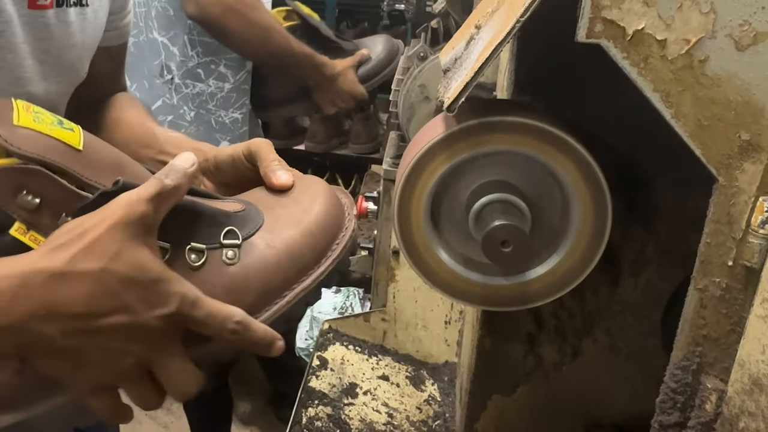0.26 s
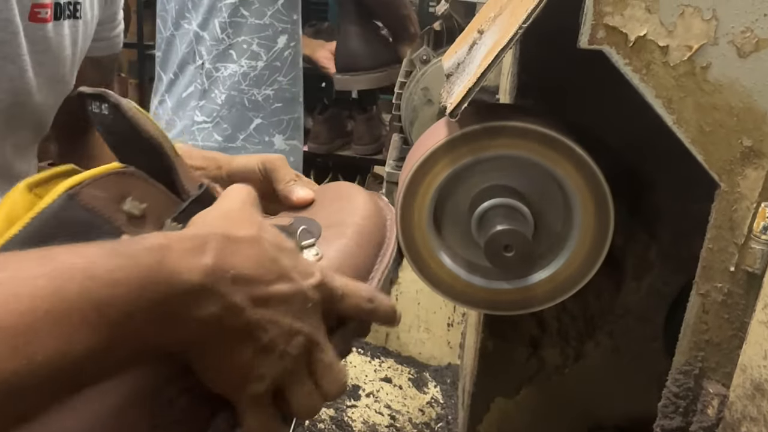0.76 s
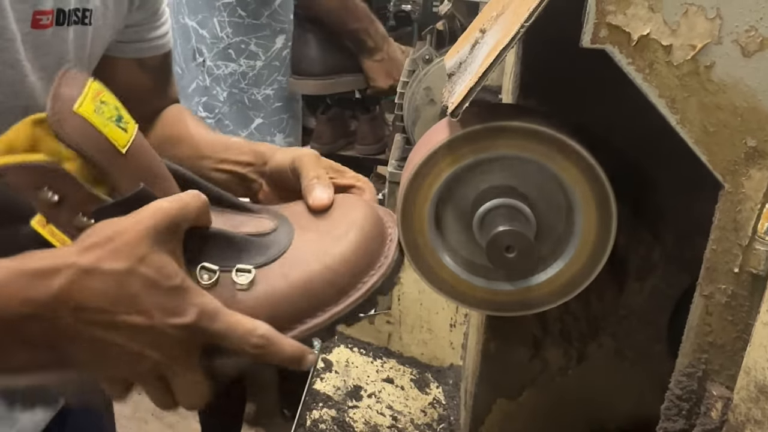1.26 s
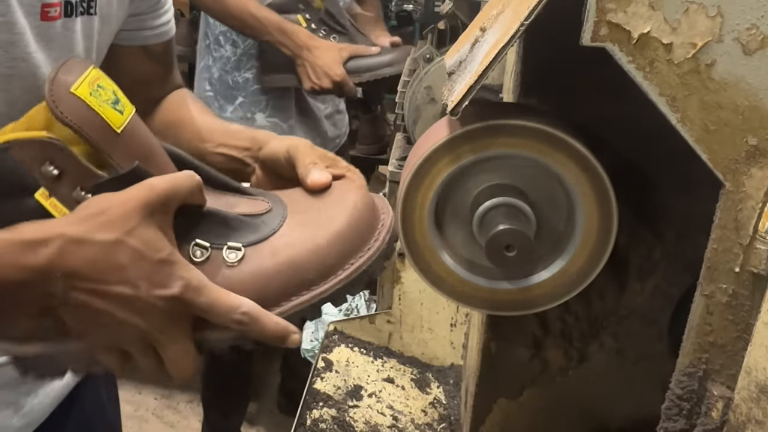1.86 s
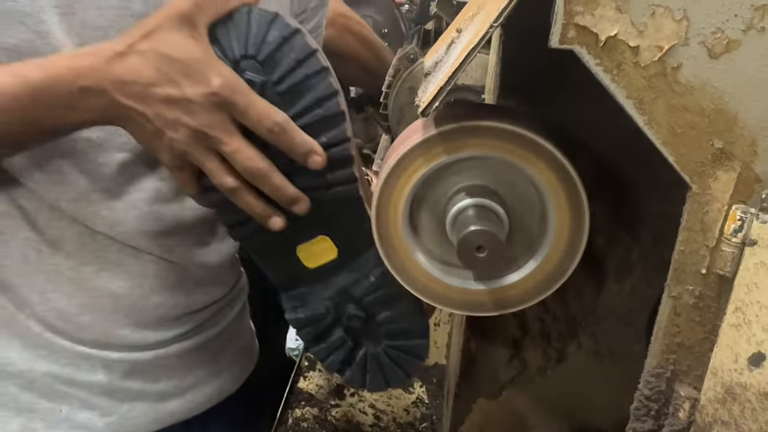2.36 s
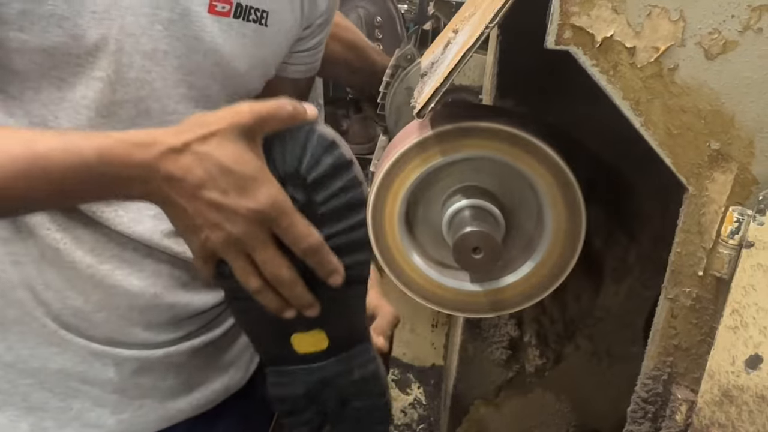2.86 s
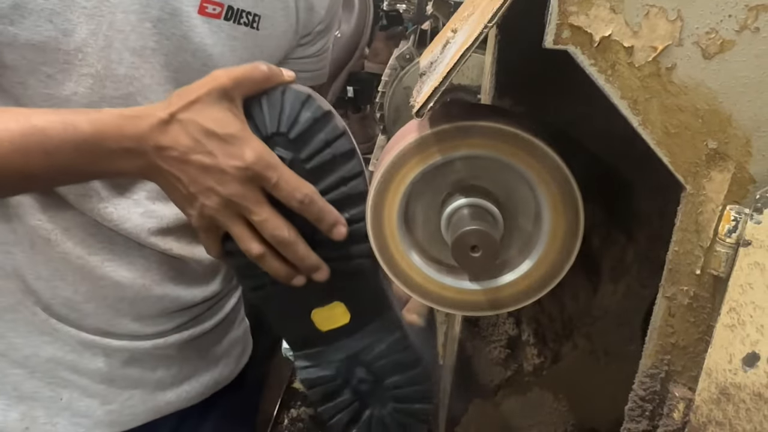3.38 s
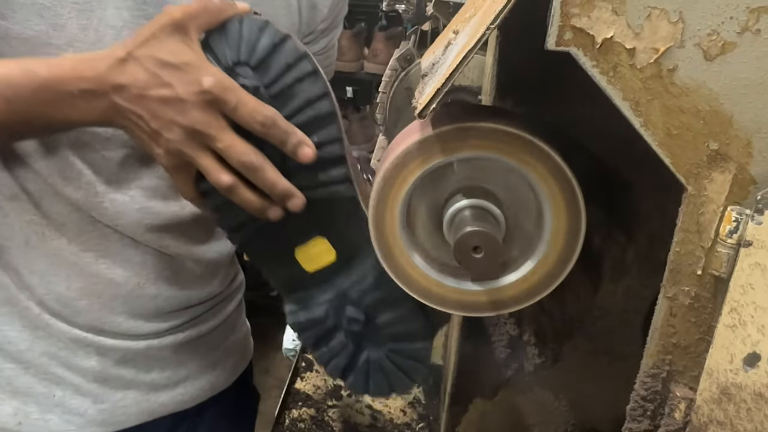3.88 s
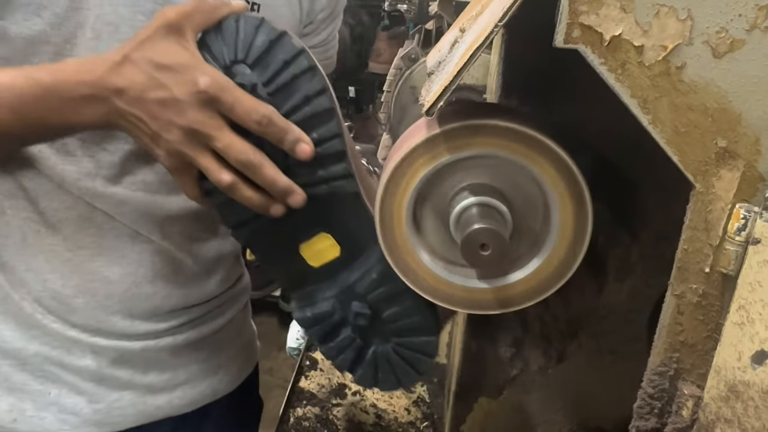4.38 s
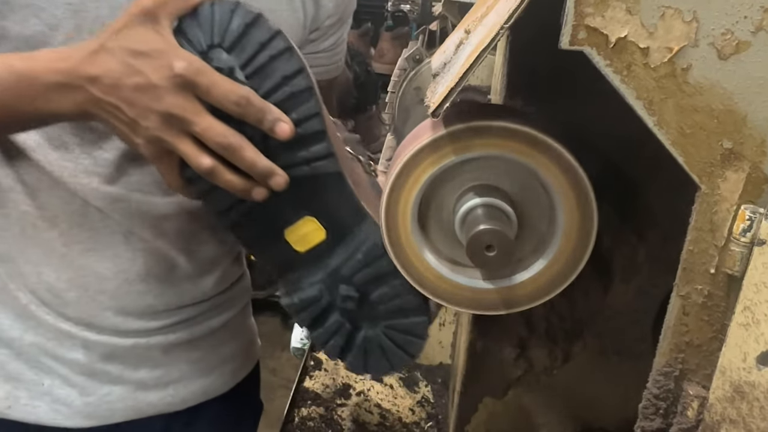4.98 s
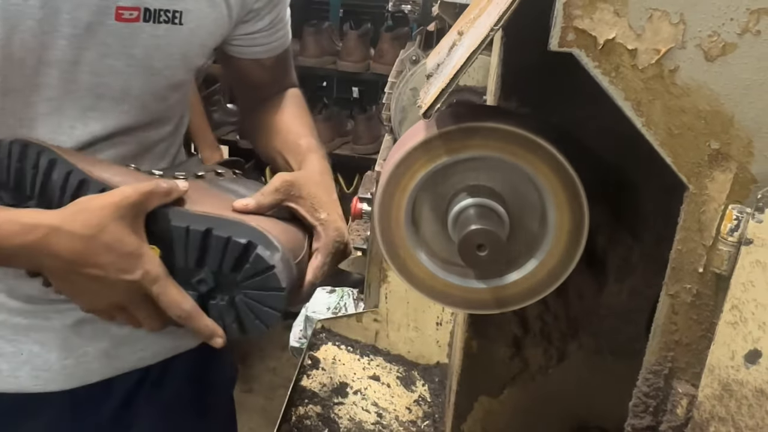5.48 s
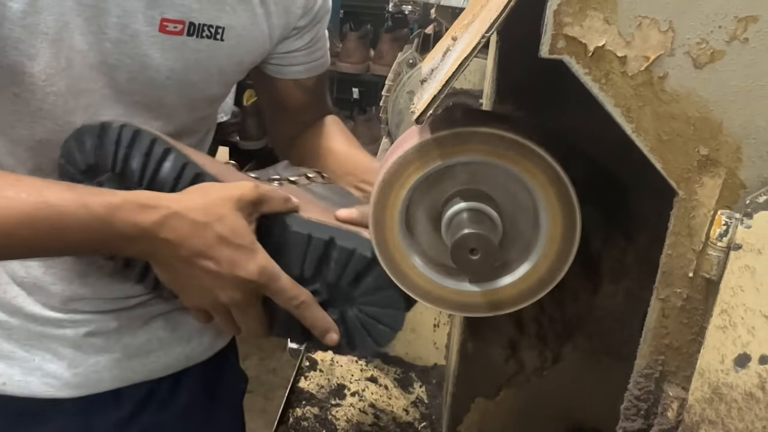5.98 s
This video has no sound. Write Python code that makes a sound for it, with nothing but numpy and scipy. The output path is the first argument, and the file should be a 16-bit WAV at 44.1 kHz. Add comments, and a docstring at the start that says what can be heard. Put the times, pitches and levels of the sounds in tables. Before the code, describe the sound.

Close stereo sound in a shoe factory. Throughout, an extractor fan booms through sheet-metal ducting, a deep roar strongest in the low range, with a near-steady low hum that gently swells; far machines hiss faintly. At first only this is heard, with a tiny dull knock about 0.55 s. From 0.8 s a boot's leather meets a spinning wheel: bright, dry rasping strokes near 0.8, 1.2, 1.6 and 2.05 s, each about 0.2 s, fluttering rapidly around fifty times a second. A thin high squeal colours 1.05-1.4 s, with a soft thud at 1.2. A short knock at 2.25 marks the turn to rubber. Dense, hissing, gritty passes run to 3.9 s with quick ticks and a hollow drone, then lighter steady rubbing until a stronger press near 5.1. Contact almost vanishes at 5.25-5.8, except a weak brush at 5.5 and a dull bump at 5.7, then firm scraping returns to the end, about 6.2 s.

```python
"""Shoe factory: an extractor fan roars in its sheet-metal duct and hums at its blade rate; far machines hiss.
A boot is pressed on a spinning buffing wheel: four strokes on leather, then long passes along rubber.
The wheel is out of round, so the scraping throbs once a turn. Light contact squeals; the boot body drones.
Air, scraping, squeal and drone are shaped noise, the blade hum is sines, thuds are filtered noise bursts.
Two close microphone ports hear it."""
import sys
import numpy as np
from scipy import signal
from scipy.io import wavfile
from scipy.ndimage import uniform_filter1d

SR = 44100
rng = np.random.default_rng(int(sys.argv[2]) if len(sys.argv) > 2 else 0)


def persist_wave(psi):
    """Save psi, clipped to +-1, as 16-bit WAV."""
    counts = np.round(np.clip(psi, -1, 1) * 32767).astype(np.int16)
    wavfile.write(sys.argv[1], SR, np.atleast_2d(counts).T)


N = 275075

# All spectra are relative: noise() scales its result to rms 1.
# Port pair. Each row: frequency in Hz, left-right likeness 0-1, left lead in radians, left over right in dB.
PORTS = [(20, .99, 0, 0), (100, .993, -.08, -.7), (200, .985, -.2, -1.6), (330, .8, -.6, -.6),
         (700, .6, -.9, -3), (1150, .55, -.5, -1), (1600, .3, -1, -1), (2050, .75, 0, .3),
         (3000, .62, 1.1, .5), (4400, .75, .3, 1.2), (5500, .45, 1.2, 1), (6700, .58, .8, 2),
         (7600, .6, 2.6, 4), (8200, .85, 5.8, 2.5), (8700, .9, 6.1, .3), (9700, .62, 4.7, 0),
         (10550, .985, np.pi, 0), (10900, .999, np.pi, 0), (11900, .995, np.pi, 0), (12600, .72, 2, 0),
         (13300, .8, .8, 0), (14000, .99, 0, 0), (14900, .98, 0, 0), (15800, .72, -.8, .5)]
EDGE_HZ = 15780  # top of the recorder's band

# Duct turbulence. Each row: frequency in Hz, density in dB per Hz.
AIR_SPECTRUM = [(20, -48), (32, -49), (50, -20.5), (85, -15), (140, -16.5), (250, -17.5), (500, -24.5),
                (800, -31.5)]
# Duct resonances. Each row: frequency in Hz, width in Hz, density in dB per Hz.
DUCT_RESONANCES = [(96, 19, -13.5), (142.4, 32, 0.5), (189.6, 21, -4.5), (218, 14, -16.5), (267, 18, -28),
                   (301, 25, -20.5), (342, 20, -14), (367.5, 43.4, -12), (457, 35, -18), (505, 30, -28.5),
                   (558.7, 16, -19.5), (602, 34, -24), (658, 59, -23), (928, 140, -35)]
# Roar level. Each row: time in seconds, level in dB.
ROAR_LEVEL = [(0, -17.5), (.6, -18.5), (2.2, -18), (2.5, -17), (2.9, -17.5), (3.1, -17), (3.7, -17),
              (4, -16.5), (4.3, -17.5), (4.6, -17), (5.25, -17), (5.6, -18.5), (6.24, -17)]

BLADE_HZ = 287.2  # mean blade rate
# Blade tones. Each row: multiple of the blade rate, left and right rms level before waver and swell in dB,
# left lead in radians, rms waver in dB, share of the low swell, share of the high swell.
BLADE_TONES = [(1, -31, -29.5, -0.82, 1.14, 0.86, 0.), (2, -37, -33.5, -0.98, 1.64, 0.16, .9),
               (3, -45, -46, -1.58, 0.3, 0.27, 0.57), (4, -50.5, -48, -0.16, 2.05, -.3, 0.)]
# Slow swell of the hum. Each row: time in seconds, low swell in dB, high swell in dB.
HUM_SWELL = [(0, -2.5, -8), (.7, 2, 0), (2.2, -0.5, -4.5), (2.4, 2.5, 1.5), (2.9, 2.5, 2.5), (3.6, 1.5, 1),
             (3.9, -2, 5), (4.3, -1.5, 0), (5.3, 0, -1), (5.9, -1, 3), (6.24, -1.5, -2)]

# Other machines in the hall. Each row: frequency in Hz, density in dB per Hz.
SHOP_SPECTRUM = [(300, -85), (800, -69), (1200, -67.5), (1700, -72.5), (2500, -76), (3300, -77),
                 (4200, -86), (5300, -84.5), (6300, -79), (7200, -80), (8200, -84.5), (9200, -89),
                 (11000, -106), (13000, -108), (16000, -94)]

# Dull scrapes and thuds. Each row: start in seconds, level before rise and decay in dB, rise in seconds,
# t60 in seconds, top frequency in Hz.
THUDS = [(.547, -30, .004, 0.076, 3600), (.568, -32, .008, 0.2, 2000), (1.2, -24.5, 0.023, 0.44, 2000),
         (2.25, -24.5, .001, .022, 5000), (5.692, -26.5, .002, .07, 1200)]

# Boot body. Each row: frequency in Hz, density in dB per Hz.
BODY_SPECTRUM = [(700, -23), (1200, -4.5), (1700, -4.5), (2200, -3), (2700, -4.5), (3300, -2), (3800, -13),
                 (4500, -14)]
# Boot drone while the rubber drags. Each row: time in seconds, level before waver in dB.
DRONE_LEVEL = [(2.2, -40.5), (2.5, -42), (3.23, -44), (3.28, -40.5), (5.2, -40), (5.27, -57), (5.8, -58),
               (5.81, -41.5), (6.24, -38.5)]

WHEEL_HZ = 49.3
SAME_GRIT, SAME_SQUEAL = .4, .7  # likeness of one turn to the last, 0-1
# Leather squeal at light contact. Each row: time in seconds, level before throb and waver in dB.
SQUEAL_LEVEL = [(1, -75), (1.04, -47), (1.09, -45), (1.15, -45), (1.19, -43), (1.24, -40), (1.3, -52),
                (1.45, -70)]
# Squeal bands. Each row: frequency in Hz, width in Hz, level in dB.
SQUEAL_BANDS = [(4560, 60, 0), (4710, 60, 0), (5170, 50, -4), (5460, 50, -8)]

# Fine dust, before the housing dips. Each row: frequency in Hz, density in dB per Hz.
HISS_SPECTRUM = [(2500, -14), (4500, -7.5), (6500, -8.5), (7800, -3.5), (8800, -3), (10000, -2.5),
                 (11500, -1), (13500, 0.5), (16000, -1.5)]
# Grit tearing leather, before toe cap and housing. Each row: frequency in Hz, density in dB per Hz.
LEATHER_SPECTRUM = [(1500, -46), (2700, -10), (3300, -2), (4200, -4), (5000, -3), (7500, -1.5), (9000, -7),
                    (11000, -9)]
# Toe cap resonances. Each row: frequency in Hz, width in Hz, lift in dB.
TOE_CAP_RESONANCES = [(3550, 400, 2.5), (4500, 700, 5), (5900, 600, 4), (7000, 700, 4), (8800, 700, 4)]
# Grit dragging rubber, before the housing dips. Each row: frequency in Hz, density in dB per Hz.
RUBBER_SPECTRUM = [(900, 1.5), (1800, -10), (2600, -2), (3300, -2), (4000, -4), (4800, -0.5), (5700, 0.5),
                   (7000, 1.5), (8500, -4), (11000, -38)]
# Echo cancellations of the wheel housing. Each row: frequency in Hz, width in Hz, dip in dB.
HOUSING_DIPS = [(3900, 350, -4), (6000, 350, -3), (7450, 450, -4)]

# Boot resting lightly on the wheel. Each row: start in seconds, end in seconds, contact level in dB.
TOUCHES = [(0.774, 1.765, -43), (2.07, 3.67, -48), (3.71, 3.9, -40), (3.93, 5.225, -42.5), (5.24, 5.8, -57),
           (5.836, 6.3, -38)]
TOUCH_DB_PER_S, LEAVE_DB_PER_S = 400, 263
# Boot pushed harder. Each row: start in seconds, rise in seconds, length in seconds, contact level in dB,
# change to the end in dB, throb depth 0.1 s after the start in dB, lag of the high spot in turns.
PUSHES = [(0.812, 0.077, .17, -28, -3.5, 6.5, 0.51), (1.181, 0.025, 0.2, -29, 0.5, 7.5, 0.36),
          (1.572, 0.016, 0.172, -32, 1, 8, 0.28), (2.051, 0.0068, 0.14, -30, 0.5, 6.5, 0.025),
          (2.303, 0.017, 0.11, -40, -4, 5, 0.44), (2.423, 0.09, 0.19, -31.5, -10.5, 1, 0.56),
          (2.59, 0.029, 0.25, -34, -0.5, 0.5, 0.62), (2.846, 0.14, .135, -30, -3.5, 2, 0.073),
          (2.996, 0.05, 0.06, -32, 0, 2, .1), (3.079, 0.11, 0.16, -28.5, -9, 2, 0.1),
          (3.238, 0.037, 0.036, -28, 0, 0, 0.14), (3.29, 0.092, 0.27, -30.5, -5, 1, 0.13),
          (3.591, 0.0065, 0.067, -31, -7.5, 4, .15), (3.691, 0.014, 0.18, -34.5, 0.5, 1.5, 0.41),
          (4.404, .05, 0.17, -40.5, 1.5, 5, 0.82), (4.667, .03, 0.17, -38, -3.5, 2, .1),
          (5.063, 0.11, 0.12, -30.5, -5, 0.5, 0.66), (5.497, 0.018, 0.19, -39, -21, -1, 0.92),
          (5.83, 0.11, 0.14, -34.5, -2, 0, .2)]
# Relative to the push level at first, then to its end level.
PUSH_FROM_DB, RELEASE_S, RELEASE_DB, TRAIL_S, TRAIL_DB = -10.5, 0.0083, -4.5, 0.038, -16
REST_THROB_DB, THROB_FADES_DB_PER_S = 0, 13
BITE_SLIP_TURNS = .025  # rms, high spot early or late

# Grazes of the high spot. Each row: time in seconds (onset 3 ms sooner), contact level before the pulse
# shape in dB.
GRAZES = [(.717, -40.5), (.775, -54), (.803, -35), (.824, -38), (.845, -37), (1.001, -27.5), (1.151, -34),
          (1.185, -30), (1.403, -37), (1.436, -40), (1.518, -40), (1.561, -28), (1.838, -39.5),
          (1.905, -42), (1.982, -33), (2.027, -27.5), (2.258, -34), (2.279, -35), (2.319, -36),
          (2.382, -34), (2.402, -34), (2.443, -34), (2.462, -27), (2.499, -33), (2.525, -35), (2.653, -31),
          (2.798, -30), (2.94, -26.5), (2.977, -35), (3.04, -36), (3.079, -30), (3.104, -30), (3.13, -30),
          (3.158, -34), (3.2, -36), (3.261, -37.5), (3.318, -27), (3.369, -41), (3.558, -43), (3.592, -32),
          (3.613, -33), (3.635, -36), (3.785, -36), (3.825, -42), (3.883, -37), (4.308, -39), (4.549, -36),
          (4.862, -35), (5.03, -31), (5.244, -47), (5.814, -27)]
GRAZE_S, SMALL_GRAZES_PER_S, SMALL_GRAZE_DB = 0.01, 5, -5  # small: by chance, dB against contact

TURN_OVER_S = 2.2  # boot turned from leather to rubber
REST_DB, HISS_DB = -42, 6  # reference contact; hiss over contact
LEATHER_RASP_DB, RUBBER_RASP_DB = 5, 1.8  # over contact at REST_DB, before RASP_LIFT
LEATHER_RASP_SINKS, RUBBER_RASP_SINKS = 0.18, 0.71  # dB lost per dB of push
RASP_FILLS = .25  # share of the throb the rasp lacks: it sounds on between bites
# Rasp drop with the boot nearly clear, end values held. Each row: time in seconds, change in dB.
RASP_LIFT = [(5.26, -3.5), (5.3, -5), (5.79, -1), (5.8, -0.5)]


def gain_of(db):
    """Decibels to gain."""
    return 10 ** (np.asarray(db) / 20)


def evened(x):
    """Scales to rms 1."""
    return x / np.sqrt(np.mean(x ** 2) + 1e-20)


def read(points, hz):
    """Reads the columns of a spectrum table on a log-frequency axis."""
    f, *columns = np.transpose(points)
    return np.squeeze([np.interp(np.log(hz + 30), np.log(f + 30), c) for c in columns])


def over_time(points, t, **ends):
    """Reads a two-column time table along t."""
    return np.interp(t, *np.transpose(points), **ends)


def wander(hz):
    """Slow chance up to hz, rms 1."""
    steps = rng.standard_normal(round(N / SR * hz * 2) + 2)
    return evened(signal.resample(steps, N))


def each_turn(x, same):
    """The same grit comes round again: every turn repeats part of the one before."""
    turn = round(SR / WHEEL_HZ)
    rows = np.pad(x, [(0, 0), (0, -N % turn)]).reshape(len(x), -1, turn)
    mixed = signal.lfilter([np.sqrt(1 - same ** 2)], [1, -same], rows, axis=1)
    return mixed.reshape(len(x), -1)[:, :N]


def noise(gain, size, patchy_db, diffuse, lean_db=0., patch_hz=690, patch_s=0.028):
    """Noise with a patchy spectrum as the two ports hear it; diffuse sound is less alike in the ports."""
    frames, hz = 4 * N // size + 5, np.fft.rfftfreq(size, 1 / SR)
    a, b, c, d, patches = rng.standard_normal((frames, len(hz), 5)).T
    patches = uniform_filter1d(patches, size=round(patch_hz / hz[1]), axis=0)
    patches = evened(uniform_filter1d(patches, size=round(4 * patch_s * SR / size), axis=1))
    same, lead, left_db = read(PORTS, hz)[:, :, None]
    same = np.clip(same, 0, 1) ** (1 + max(diffuse, 0))
    left_db = left_db + lean_db * np.exp(-((hz[:, None] - 6500) / 1800) ** 2)
    first = a + 1j * b
    second = same * first + np.sqrt(1 - same ** 2) * (c + 1j * d)
    left = first * np.exp(1j * lead) * gain_of(left_db / 2)
    right = second * gain_of(-left_db / 2)
    z = np.array([left, right]) * gain(hz)[:, None] * gain_of(patchy_db * patches)
    return evened(signal.istft(z, nperseg=size, noverlap=size * 3 // 4)[1][:, :N])


def shop():
    """Far machines blend to a smooth hiss, stronger on the left around 6.5 kHz."""
    def gain(hz):
        return gain_of(read(SHOP_SPECTRUM, hz))
    far = noise(gain, size=1024, patchy_db=1.5, diffuse=0.51, lean_db=4.5)
    return gain_of(-39.5 + 1.1 * wander(4.5)) * far


def roar():
    """Air noise booms in the resonances of the duct."""
    def gain(hz):
        booms = sum(gain_of(db) ** 2 / (1 + (2 * (hz - f) / w) ** 2) ** 2 for f, w, db in DUCT_RESONANCES)
        air = gain_of(read(AIR_SPECTRUM + [(3000, -56.5)], hz))
        return np.sqrt(air ** 2 + booms * (hz > 40))
    level_db = over_time(ROAR_LEVEL, np.arange(N) / SR)
    return noise(gain, size=4096, patchy_db=.5, diffuse=0.) * gain_of(level_db)


def blades():
    """Blades passing the fan outlet give a near-steady tone and overtones that waver in the hall."""
    turns = np.cumsum(BLADE_HZ + 0.24 * wander(1.5)) / SR
    s, *swells = np.transpose(HUM_SWELL)
    low_db, high_db = (np.interp(np.arange(N) / SR, s, db) for db in swells)
    out = np.zeros((2, N))
    for k, left_db, right_db, lead, waver_db, low, high in BLADE_TONES:
        angle = 2 * np.pi * (round(k) * turns + rng.random()) + np.array([[lead], [0]])
        change_db = waver_db * wander(6.5) + low * low_db + high * high_db
        level = gain_of([[left_db], [right_db]] + change_db)
        out += np.sqrt(2) * level * np.sin(angle)
    return out


def thuds():
    """Short bursts of dull noise that swell and die in the hall."""
    t, out = np.arange(N) / SR, np.zeros((2, N))
    lowpass = signal.butter(2, 3200, fs=SR, output="sos")
    lowered = signal.sosfilt(lowpass, rng.standard_normal((2, N)))
    for s, db, rise, t60, top_hz in THUDS:
        u = np.maximum(t - s, 0)
        dull = signal.sosfilt(signal.butter(1, [650, top_hz], "band", fs=SR, output="sos"), lowered)
        out += evened(dull) * np.minimum(u / rise, 1) * gain_of(db - 60 * u / t60)
    return out


def drone():
    """The hollow boot sounds along smoothly, without the throb of the wheel."""
    def gain(hz):
        return gain_of(read(BODY_SPECTRUM, hz))
    body = noise(gain, size=512, patchy_db=2.2, diffuse=.1)
    level_db = over_time(DRONE_LEVEL, np.arange(N) / SR, left=-120)
    return body * gain_of(level_db + 1.4 * wander(20))


def squeal():
    """Narrow bands of friction noise that nearly repeat each turn."""
    def gain(hz):
        return sum(gain_of(db) / (1 + (2 * (hz - f) / w) ** 2) for f, w, db in SQUEAL_BANDS)
    t = np.arange(N) / SR
    band = noise(gain, size=2048, patchy_db=1., diffuse=0., patch_hz=200, patch_s=.05)
    throb_db = 5.5 * np.cos(2 * np.pi * (WHEEL_HZ * t - .03))
    level_db = over_time(SQUEAL_LEVEL, t, left=-120, right=-120)
    return each_turn(band, SAME_SQUEAL) * gain_of(level_db + throb_db + 1.5 * wander(60))


def housing(hz):
    """Gain of the scraping, dipped where the housing echo cancels it."""
    return gain_of(sum(db * np.exp(-(2 * (hz - f) / width) ** 2) for f, width, db in HOUSING_DIPS))


def dust_gain(hz):
    """Spectrum of the fine-dust hiss inside the housing."""
    return housing(hz) * gain_of(read(HISS_SPECTRUM, hz))


def leather_gain(hz):
    """Spectrum of the leather rasp, lifted at the resonances of the toe cap."""
    lift_db = sum(db * np.exp(-(2 * (hz - f) / width) ** 2) for f, width, db in TOE_CAP_RESONANCES)
    return housing(hz) * gain_of(read(LEATHER_SPECTRUM, hz) + lift_db)


def rubber_gain(hz):
    """Spectrum of the rubber rasp inside the housing."""
    return housing(hz) * gain_of(read(RUBBER_SPECTRUM, hz))


def touch_db(t, start, end, db):
    """Light contact: a level flanked by steep dB ramps."""
    coming = TOUCH_DB_PER_S * np.maximum(start - t, 0)
    leaving = LEAVE_DB_PER_S * np.maximum(t - end, 0)
    return db - coming - leaving


def push_db(t, start, rise, length, db, change_db):
    """A push rises, drifts, drops quickly, then trails off."""
    corners_s = np.cumsum(np.abs([0, rise, length - rise, RELEASE_S, TRAIL_S]))
    corners_db = [PUSH_FROM_DB, 0, change_db, change_db + RELEASE_DB, change_db + TRAIL_DB]
    return db + np.interp(t - start, corners_s, corners_db, left=-100, right=-100)


def pressure(t):
    """Contact level in dB, depth of the throb, and where on the turn the high spot meets the boot."""
    rest_db = np.max([touch_db(t, *touch) for touch in TOUCHES], axis=0)
    pushes_db = np.max([push_db(t, *push[:5]) for push in PUSHES], axis=0)
    columns = np.transpose(PUSHES)
    latest = np.maximum(np.searchsorted(columns[0], t) - 1, 0)
    start, *_, throb_db, lag = columns[:, latest]
    throb_db = throb_db - THROB_FADES_DB_PER_S * (t - start - .1)
    pushed = np.clip((pushes_db - rest_db) / 4.6, 0, 1)
    depth_db = REST_THROB_DB + pushed * (throb_db - REST_THROB_DB)
    return np.maximum(rest_db, pushes_db), depth_db, lag


def grazes(press_db):
    """The high spot alone brushes the boot: a quick swell of contact."""
    u = np.arange(0, 3 * GRAZE_S, 1 / SR) / GRAZE_S
    pulse = np.minimum(u * 2.0, 1) * np.exp(-u ** 2)
    hits = gain_of(press_db + SMALL_GRAZE_DB) * (rng.random(N) < SMALL_GRAZES_PER_S / SR)
    for s, db in GRAZES:
        hits[round((s - .003) * SR)] += gain_of(db)
    return signal.oaconvolve(hits, pulse)[:N]


def buffing():
    """Hiss and rasp follow the pressure, throb once a turn and flicker as the hands shift."""
    t = np.arange(N) / SR
    rubber_share = np.clip((t - TURN_OVER_S) / 0.11, 0, 1)
    press_db, depth_db, lag = pressure(t)
    angle = 2 * np.pi * (WHEEL_HZ * t - lag - .07 + BITE_SLIP_TURNS * wander(22))
    bite = np.cos(angle + 0.25 * (np.cos(angle) - 1))  # bites fast, lets go slowly
    throb_db = depth_db * (1 + 0.17 * wander(25)) * (bite - .25)  # no two turns bite alike
    brushed = grazes(press_db)
    flicker_db = 0.91 * wander(45) + 1.22 * wander(300)
    contact = gain_of(press_db + throb_db + flicker_db) + brushed
    press_db = 20 * np.log10(gain_of(press_db) + 0.36 * np.abs(brushed))

    hiss = noise(dust_gain, size=256, patchy_db=2.1, diffuse=0., patch_hz=900, patch_s=.04)
    leather = noise(leather_gain, size=512, patchy_db=3.5, diffuse=.1, patch_hz=300, patch_s=.05)
    rubber = noise(rubber_gain, size=256, patchy_db=4.5, diffuse=.1, patch_hz=600, patch_s=.012)
    grit = np.sqrt(1 - rubber_share) * leather + np.sqrt(rubber_share) * rubber
    rasp = each_turn(grit, SAME_GRIT)

    base_db = np.interp(rubber_share, [0, 1], [LEATHER_RASP_DB, RUBBER_RASP_DB])
    sinks = np.interp(rubber_share, [0, 1], [LEATHER_RASP_SINKS, RUBBER_RASP_SINKS])
    over_rest_db = np.maximum(press_db - REST_DB, -6.0)
    rasp_db = base_db - sinks * over_rest_db + over_time(RASP_LIFT, t)
    rasp_db = rasp_db - RASP_FILLS * throb_db + 0.82 * wander(30)
    return contact * (gain_of(HISS_DB) * hiss + gain_of(rasp_db) * rasp)


def scene():
    """All sources at the two ports."""
    return shop() + roar() + blades() + thuds() + drone() + squeal() + buffing()


def record(dry):
    """The band limit of the recorder: a steep linear-phase low-pass."""
    lowpass = signal.firwin(1023, EDGE_HZ, window=("kaiser", 7), fs=SR)
    return signal.oaconvolve(dry, lowpass[None], "same")


dry = scene()
out = record(dry)
persist_wave(out)
```